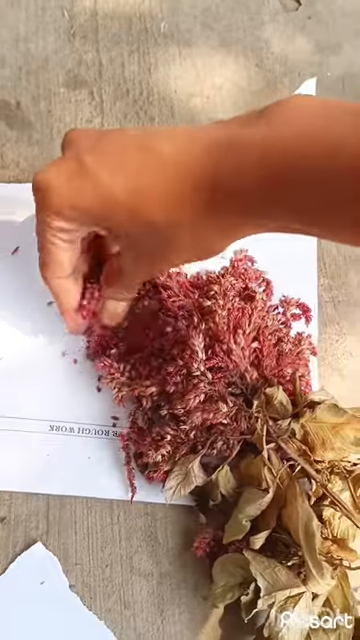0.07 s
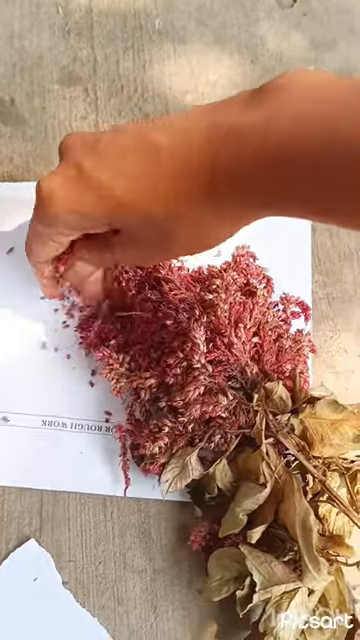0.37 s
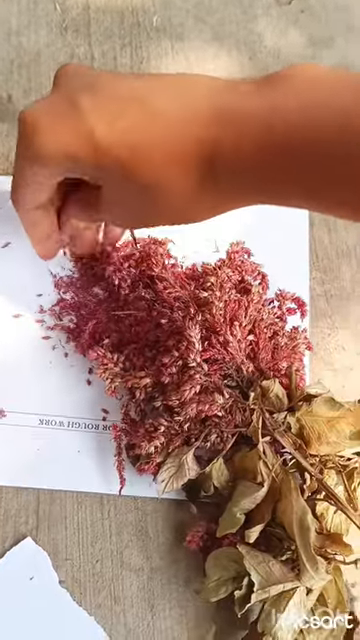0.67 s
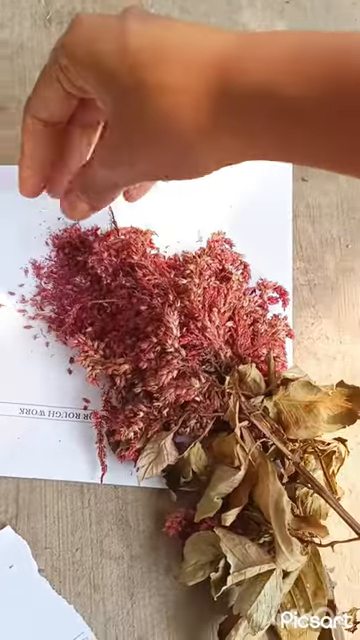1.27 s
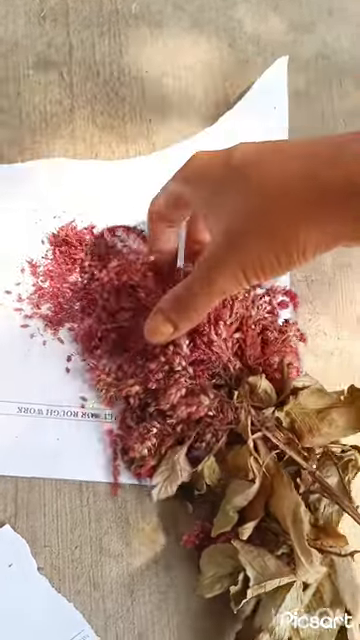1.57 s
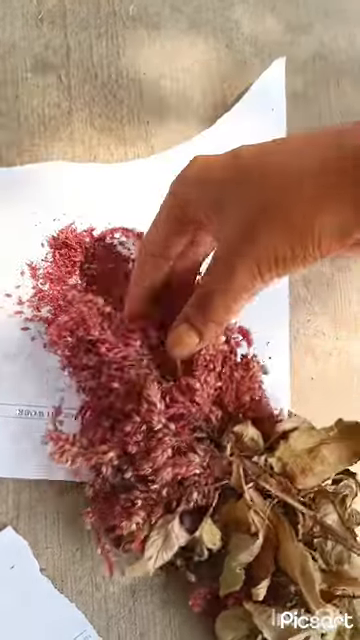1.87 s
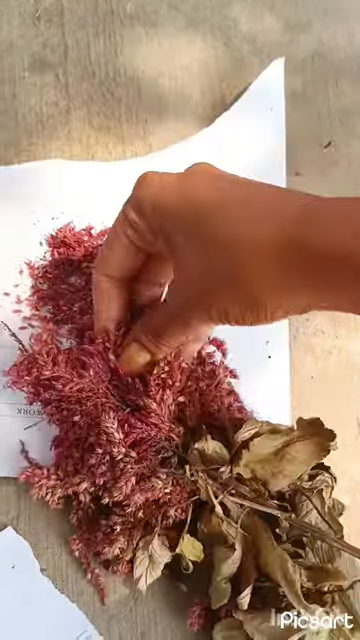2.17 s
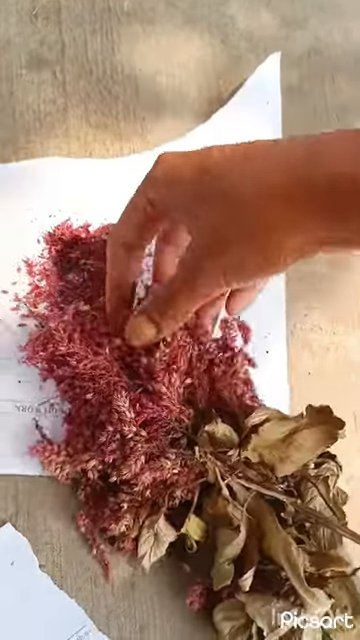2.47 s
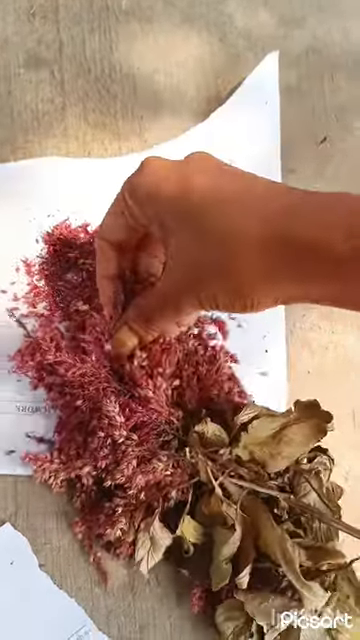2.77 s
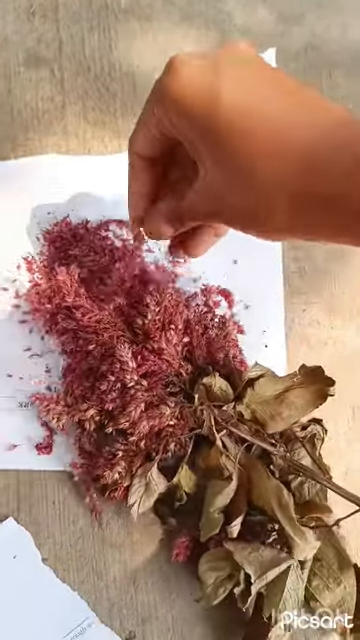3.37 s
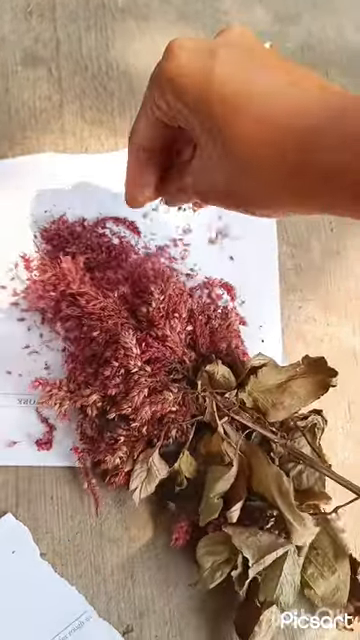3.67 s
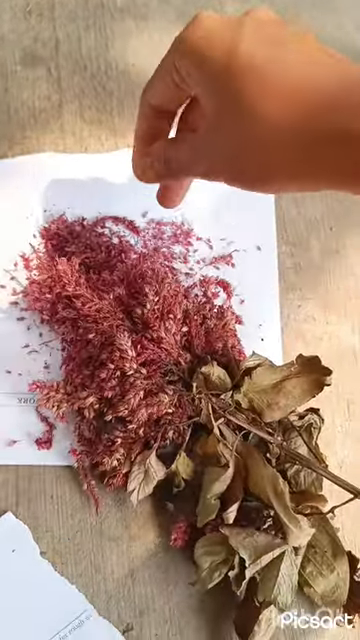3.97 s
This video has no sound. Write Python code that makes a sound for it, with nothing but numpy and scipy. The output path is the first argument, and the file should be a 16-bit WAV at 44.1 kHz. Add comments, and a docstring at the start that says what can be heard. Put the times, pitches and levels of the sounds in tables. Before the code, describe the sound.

Close, crisp crackling comes from fingers crumbling a dry flower head in a yard. The rubbing starts gently, pauses, then grows harder, with snapping stalks, while small birds keep peeping above a faint rumble.

```python
"""Over a yard's low, distant rumble, fingers lightly rub a dried flower head on paper, close by. Tiny
florets fracture in clumps, a crisp crackle above a lower rustle, with a fine sizzle that soon dies away.
From the outset small birds keep up falling peeps, and now and then a stalk snaps. After a lull, from
1.5 s, the head is pressed and pulled harder, so crunches and snaps grow louder. Soft, hollow bumps
sound near 2.4 s and 3.3 s, and the rubbing fades just before the end at 4 s."""
import sys
import numpy as np
from scipy import signal
from scipy.fft import rfft, irfft, next_fast_len
from scipy.io import wavfile
from scipy.ndimage import uniform_filter1d, map_coordinates

SR = 44100
rng = np.random.default_rng(int(sys.argv[2]) if len(sys.argv) > 2 else 0)


def bounce(signal):
    """Save signal as a 16-bit WAV file at the path given by the first command-line argument."""
    frames = np.transpose(np.atleast_2d(signal))
    limited = np.clip(frames, -1, 1)
    pcm = np.round(limited * 32767).astype(np.int16)
    wavfile.write(sys.argv[1], SR, pcm)


N = 176400

# Levels are relative. Spectral densities of the distant rumble and the outdoor air: f/Hz, level/dB
RUMBLE_SPECTRUM = [(15, -64), (25, -33), (54, -25), (102, -4), (179, 1), (308, -6.5), (349, -10.5),
                   (401, -8), (560, -14), (609, -11), (700, -20), (910, -62), (1540, -120)]
AIR_SPECTRUM = [(350, -24), (600, -1.5), (1050, -4), (1900, -3.5), (2900, -8.5), (4200, -7), (5300, -4),
                (6000, -22), (9000, -14.5), (12000, -24), (16000, -28)]
# Likeness of the background at the two ears: f/Hz, correlation
EAR_COHERENCE = [(60, 0.88), (130, 1), (290, 0.81), (640, 0.23), (1500, 0.062), (7000, 0.046)]
# Finger strokes: start t/s, end t/s, crackle level/dB, rustle level/dB
FINGER_STROKES = [(0, 0.182, -50, -61.5), (0.174, 0.415, -49.5, -68), (0.415, 0.51, -51.5, -63.5),
                  (0.54, 0.678, -53, -61), (0.753, 0.79, -50, -69), (0.845, 0.913, -55, -64.5),
                  (0.938, 1, -47.5, -60), (1.067, 1.112, -53.5, -70), (1.528, 1.55, -41.5, -53),
                  (1.55, 1.724, -35.5, -44.5), (1.717, 1.777, -40, -48.5), (1.793, 1.825, -40, -50.5),
                  (1.86, 1.968, -46, -57), (1.948, 2.135, -44.5, -54.5), (2.143, 2.173, -45, -42.5),
                  (2.192, 2.255, -45, -56.5), (2.254, 2.331, -39.5, -50.5), (2.435, 2.495, -46, -54.5),
                  (2.524, 2.67, -45.5, -54), (2.668, 2.862, -46, -55.5), (2.868, 2.967, -40, -51),
                  (2.98, 3.08, -47, -50.5), (3.098, 3.193, -42.5, -50.5), (3.175, 3.265, -38.5, -48),
                  (3.313, 3.383, -47, -59), (3.374, 3.413, -42.5, -53), (3.437, 3.525, -47.5, -56),
                  (3.578, 3.63, -48.5, -57), (3.631, 3.662, -38.5, -45.5), (3.672, 3.734, -45.5, -56),
                  (3.776, 3.897, -58.5, -66.5)]
# Clumps of florets giving way: peak t/s, half-length t/s, crackle level/dB, rustle level/dB
CLUMP_CRUNCHES = [(0.05, 0.004, -43, -43.5), (0.223, 0.007, -41, -59), (0.623, 0.0075, -42, -56),
                  (0.964, .006, -42.5, -50), (0.984, 0.0048, -43, -46), (1.573, 0.0065, -51, -34.5),
                  (1.609, 0.0053, -36, -31), (1.667, 0.0042, -31.5, -36.5), (1.693, 0.0099, -37, -35.5),
                  (1.715, 0.0042, -29.5, -37), (1.831, 0.0058, -27, -44.5), (2.041, 0.004, -36, -45),
                  (2.062, 0.0034, -33, -55), (2.16, 0.016, -35.5, -39.5), (2.331, 0.0078, -57, -40),
                  (2.624, 0.01, -40.5, -41.5), (2.886, 0.005, -38, -62), (2.919, 0.004, -37, -58),
                  (3.076, 0.0056, -26.5, -39), (3.088, 0.0065, -32, -42.5), (3.222, 0.007, -27, -29),
                  (3.4, 0.0059, -51, -36), (3.501, 0.0055, -61, -39.5), (3.735, 0.0059, -41, -60)]
# Spectral densities of the crackle and the rustle: f/Hz, level/dB
CRACKLE_SPECTRUM = [(100, -60), (1500, -15), (3000, -25.5), (4500, -8.5), (6400, -9.5), (7600, -7),
                    (8700, 0.5), (9700, -2), (11300, -10), (13500, -12), (16000, -17.5)]
RUSTLE_SPECTRUM = [(40, -70), (250, -26), (600, -13.5), (1000, -10), (1500, -8), (2050, -2), (2500, -4.5),
                   (3000, -3), (3600, -0.5), (4200, -1.5), (5200, -4.5), (7000, -11.5), (15000, -46)]
# Balance of the crackle between the ears: f/Hz, left minus right level/dB
CRACKLE_PAN = [(3000, -2.5), (6500, 2), (8300, 1.5), (10000, -6), (13000, -1.5)]
# Stem resonances: centre f/Hz, bandwidth f/Hz, level/dB
STEM_RESONANCES = [(2872, 49, 6.5), (3110, 93, 5.5), (3530, 130, -14)]
# Bird calls: start t/s, length t/s, start f/Hz, end f/Hz, level/dB
BIRD_PEEPS = [(0, 0.11, 5260, 3690, -57), (0.086, 0.1, 5220, 3680, -54), (0.319, 0.093, 5380, 4310, -54),
              (0.346, 0.056, 4146, 2980, -49), (0.689, 0.096, 5590, 4470, -56),
              (0.705, 0.037, 4234, 3860, -51), (0.761, 0.048, 4116, 3950, -49),
              (0.972, 0.068, 5540, 4610, -52), (1.053, 0.071, 4670, 3600, -49.5),
              (1.151, 0.1, 5440, 3610, -55), (1.25, 0.18, 5600, 4800, -57.5),
              (1.314, 0.091, 5315, 2930, -47), (1.451, 0.058, 5100, 3560, -59.5),
              (1.825, 0.067, 5370, 4400, -49), (1.972, 0.051, 4450, 3300, -46),
              (2.204, 0.051, 4660, 3650, -52), (2.379, 0.075, 4660, 3770, -55),
              (2.5, 0.12, 5610, 4910, -54), (2.609, 0.074, 4420, 3620, -54), (2.931, 0.05, 4650, 3740, -47),
              (2.978, 0.076, 5350, 4730, -51), (3.264, 0.067, 4630, 3350, -51.5),
              (3.299, 0.09, 5460, 4470, -53), (3.578, 0.05, 5450, 4900, -50),
              (3.61, 0.043, 4260, 3660, -50), (3.701, 0.06, 4140, 3250, -55),
              (3.875, 0.039, 5450, 5220, -57.5), (3.891, 0.058, 4790, 3740, -54.5),
              (3.946, 0.085, 5530, 4600, -52)]
# Strength of a peep along its glide: f/Hz, level/dB
PEEP_GAIN = [(3200, -2.5), (4200, 1.5), (5000, -1), (5700, 1)]
# Dry stalks breaking: t/s, level/dB
STALK_SNAPS = [(.359, -31.5), (.538, -45), (.552, -38.5), (.563, -46), (1.015, -42), (1.516, -43),
               (1.639, -29), (1.646, -30), (1.954, -31), (2.243, -33.5), (2.696, -32), (2.741, -35.5),
               (2.753, -38), (2.77, -32.5), (2.839, -29.5), (2.848, -30.5), (2.852, -31.5), (2.861, -29),
               (2.873, -30), (2.917, -27), (3.782, -42), (3.822, -42.5)]
# Stalks ring higher than florets: f/Hz, level/dB
STALK_TILT = [(5500, -3), (8200, 0.5)]
# Soft, hollow bumps: t/s, f/Hz, level/dB
HOLLOW_BUMPS = [(2.433, 641, -39), (2.458, 663, -42.5), (2.458, 930, -45), (3.268, 590, -42.5)]

YARD_T60_S = 0.11


def amp(db):
    return 10 ** (np.asarray(db) / 20)


def unit_rms(x):
    return x / np.sqrt(np.mean(x ** 2) + 1e-20)


def along(points, hz):
    """Interpolation of (f/Hz, value) points on a logarithmic frequency axis."""
    f, values = np.transpose(points)
    return np.interp(np.log(hz + 1), np.log(f + 1), values)


def wobble(per_s):
    """Random modulation: a spline through per_s Gaussian knots a second."""
    return map_coordinates(rng.standard_normal(N // 8), [np.arange(N) * per_s / SR], mode="wrap")


def filtered(x, response):
    """Linear filtering: the spectrum is multiplied by a frequency response."""
    size = next_fast_len(N + SR // 2)
    return irfft(rfft(x, size) * response(np.fft.rfftfreq(size, 1 / SR)), size)[..., :N]


def minimum_phase(spectrum, hz):
    """Causality: folding the cepstrum gives a response that rings only after it is excited."""
    cepstrum = irfft(np.log(amp(along(spectrum, hz))))
    cepstrum[1:len(cepstrum) // 2] *= 2
    cepstrum[len(cepstrum) // 2 + 1:] = 0
    return np.exp(rfft(cepstrum))


def reverberation(x, t60):
    """A diffuse field decays exponentially, with a different tail at each ear."""
    t = np.arange(SR // 3) / SR
    tail = rng.standard_normal((2, len(t))) * amp(-60 * t / t60)
    return signal.fftconvolve(np.atleast_2d(x), tail / np.linalg.norm(tail[0]), axes=1)[:, :N]


def outdoor_noise(spectrum):
    """Interaural coherence: steady noise is nearly alike at both ears in the bass, unlike in the treble."""
    def mid_side(hz):
        angle = np.arccos(along(EAR_COHERENCE, hz)) / 2
        return amp(along(spectrum, hz)) * [np.cos(angle), np.sin(angle)]
    mid, side = filtered(rng.standard_normal((2, N)), mid_side)
    return unit_rms(np.array([mid + side, mid - side]))


def finger_envelopes(rise_s=0.0064, fade_s=0.023, clump_db=1.5, grip_db=1.1, rustle_gain_db=3):
    """Incoherent sources add in power: strokes and crunches sum to the rms of crackle and rustle."""
    t = np.arange(N) / SR
    crackle_power, rustle_power = np.zeros((2, N))
    for start, end, crackle_db, rustle_db in FINGER_STROKES:
        press = np.clip((t - start) / rise_s, 0, 1) * np.exp(-np.maximum(t - end, 0) / fade_s)
        crackle_power += (amp(crackle_db) * press) ** 2
        rustle_power += (amp(rustle_db) * press) ** 2
    bunching_db = clump_db * wobble(per_s=130)  # florets give way in bunches
    crackle_power *= amp(bunching_db) ** 2
    rustle_power *= amp(rustle_gain_db + bunching_db + grip_db * wobble(per_s=160)) ** 2
    for at, half_length, crackle_db, rustle_db in CLUMP_CRUNCHES:
        swell = np.exp(-((t - at) / half_length) ** 2)
        crackle_power += amp(crackle_db) ** 2 * swell
        rustle_power += amp(rustle_db) ** 2 * swell
    return np.sqrt(crackle_power), np.sqrt(rustle_power)


def fractures(coherence=0, per_s=5000, spread_db=2, scatter_t60_s=0.02, scatter_db=-4.5):
    """Shot noise: tiny fractures of uneven size, each scattered briefly through the dry head."""
    breaks = rng.random(N) < per_s / SR
    size = breaks * amp(spread_db * np.minimum(rng.exponential(size=N), 5))
    energy_kept = amp(-120 / (scatter_t60_s * SR))  # per sample
    haze = np.sqrt(signal.lfilter([1], [1, -energy_kept], size ** 2))
    direct, scattered = rng.standard_normal((2, 3, N))  # each has rows left, right, common
    grains = unit_rms(size) * direct + amp(scatter_db) * unit_rms(haze) * scattered
    return unit_rms(np.sqrt(coherence) * grains[2] + np.sqrt(1 - coherence) * grains[:2])


def radiated(source, rms, response, patch_db=3):
    """Source and filter: each clump adds its own colour, a random gain over about 1 kHz by 25 ms."""
    spectra = signal.stft(source, nperseg=256)[2]
    patches = uniform_filter1d(rng.standard_normal(spectra.shape[1:]), size=6, axis=0)
    patches = uniform_filter1d(patches, size=9, axis=1)
    patchy = signal.istft(spectra * amp(patch_db * unit_rms(patches)), nperseg=256)[1][:, :N]
    return filtered(patchy * rms, response) / filtered(patchy, response).std()


def pan(db):
    """An interaural level difference, left minus right, is split evenly between the ears."""
    return amp(np.outer([.5, -.5], db))


def sway(centre_db):
    """The image wanders as the interaural level difference drifts."""
    return pan(centre_db + 1.1 * wobble(per_s=24.97))


def floret_response(hz):
    """Transfer function from a breaking floret to each ear."""
    return minimum_phase(CRACKLE_SPECTRUM, hz) * pan(along(CRACKLE_PAN, hz))


def floret_crackle(rms):
    """Brittle fracture: breaking florets emit brief impulses, rich in treble."""
    return radiated(fractures(), rms * sway(centre_db=0), floret_response)


def stem_rustle(rms, left_lag_s=.00003):
    """Resonance: fractures in the pressed head excite the lower modes of the stems."""
    def response(f):
        delay = np.exp(-2j * np.pi * np.outer([left_lag_s, 0], f))
        modes = sum(amp(db) * 1j * f * width / (centre ** 2 - f ** 2 + 1j * f * width)
                    for centre, width, db in STEM_RESONANCES)
        return delay * minimum_phase(RUSTLE_SPECTRUM, f) * (1 + modes)
    return radiated(fractures(coherence=0.55), rms * sway(centre_db=-1.2), response)


def seed_sizzle(level_db=-56, fade_s=.55, lowest_hz=11000):
    """High-passed shot noise: loose seeds trickle onto the paper at the start, and the sizzle dies away."""
    fade = np.exp(-(np.arange(N) / SR / fade_s) ** 4)
    return amp(level_db) * fade * unit_rms(filtered(fractures(), lambda hz: hz > lowest_hz))


def bird_peeps(plunge=.5, overtone_db=-8.5, direct_db=-1, echo_db=4, t60_s=0.22):
    """Frequency modulation: each peep sags, then plunges and grows hoarse; reverberation smears it."""
    calls = np.zeros((2, N + SR))
    hoarseness = .062 * wobble(per_s=900)
    quaver = .008 * wobble(per_s=130)
    flutter_db = 2.2 * wobble(per_s=130)
    for at, length, start_hz, end_hz, db in BIRD_PEEPS:
        progress = np.linspace(0, 1, int(length * SR))
        first = int(at * SR)
        during = (first + np.arange(len(progress))) % N
        hz = start_hz + (end_hz - start_hz) * ((1 - plunge) * progress + plunge * progress ** 4)
        phase = 2 * np.pi * np.cumsum(hz * (1 + quaver[during] + progress * hoarseness[during])) / SR
        swell = np.interp(progress, [0, .1, .49, 1], [0.42, 0.64, 0.81, 0.82])
        envelope = amp(db + flutter_db[during] + along(PEEP_GAIN, hz)) * swell
        overtone = amp(overtone_db + along([(3800, -5.5), (4600, 0), (5200, -31)], hz))
        calls[:, first:first + len(progress)] += envelope * (np.sin(phase) + overtone * np.sin(2 * phase))
    calls = calls[:, :N]
    return amp(direct_db) * calls + amp(echo_db) * reverberation(calls, t60_s)


def stalk_snaps(decay_s=0.0025, click_s=.0004, click_db=-4):
    """Impulsive excitation: a breaking stalk gives a click and a quickly damped burst of noise."""
    t = np.arange(N) / SR
    envelope = np.zeros(N)
    for at, db in STALK_SNAPS:
        age = abs(t - at)
        envelope += (t >= at) * amp(db) * (np.exp(-age / decay_s) + amp(click_db) * np.exp(-age / click_s))
    noise = rng.standard_normal((2, N))
    return radiated(noise, envelope, lambda hz: floret_response(hz) * amp(along(STALK_TILT, hz)))


def hollow_bumps(rise_s=0.0058):
    """Damped oscillation: short tones with a rounded onset and unsteady phase, blurred by the yard."""
    bumps = np.zeros(N)
    for at, hz, db in HOLLOW_BUMPS:
        age = np.maximum(np.arange(N) / SR - at, 0)
        envelope = amp(db) * age / rise_s * np.exp(1 - age / rise_s)
        bumps += envelope * np.sin(2 * np.pi * hz * age + 0.75 * wobble(per_s=300))
    return .5 * bumps + .5 * reverberation(bumps, YARD_T60_S)


def scene(echo_db=-7, rumble_db=-48, air_db=-56.5):
    """Superposition: the close flower and its echo add to the birds, bumps and outdoor noise."""
    crackle_rms, rustle_rms = finger_envelopes()
    flower = floret_crackle(crackle_rms) + stem_rustle(rustle_rms) + stalk_snaps()
    flower += amp(echo_db) * reverberation(flower, YARD_T60_S)
    events = flower + seed_sizzle() + bird_peeps() + hollow_bumps()
    rumble = amp(rumble_db) * outdoor_noise(RUMBLE_SPECTRUM)
    air = amp(air_db) * outdoor_noise(AIR_SPECTRUM)
    return events + rumble + air


def record(dry, top_hz=15950):
    """Band limiting: an ideal low-pass filter removes the highest treble."""
    return filtered(dry, lambda hz: hz < top_hz)


dry = scene()
out = record(dry)
bounce(out)
```